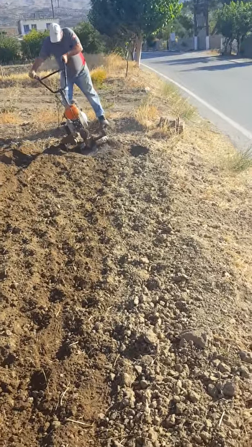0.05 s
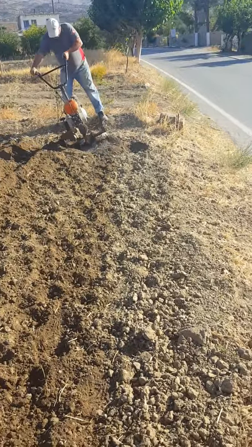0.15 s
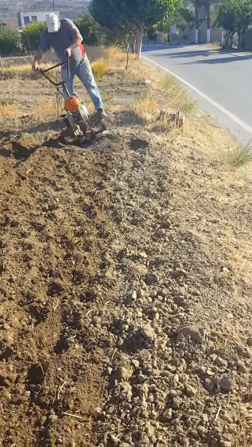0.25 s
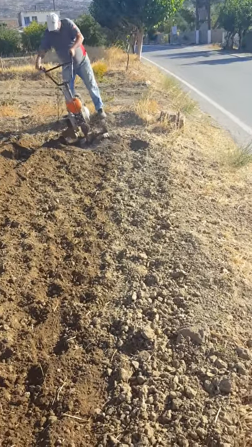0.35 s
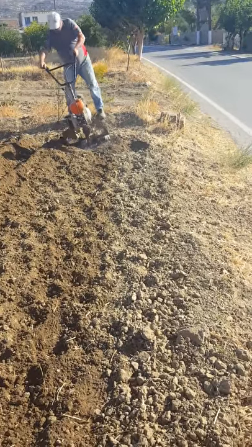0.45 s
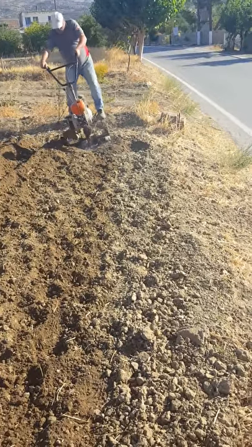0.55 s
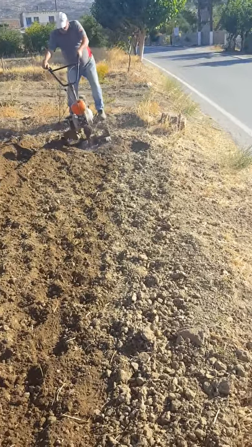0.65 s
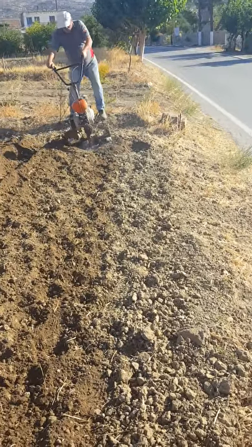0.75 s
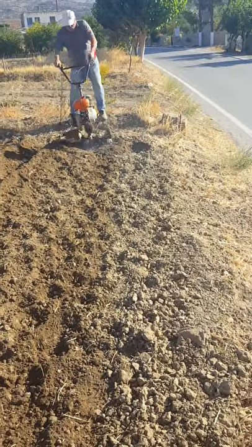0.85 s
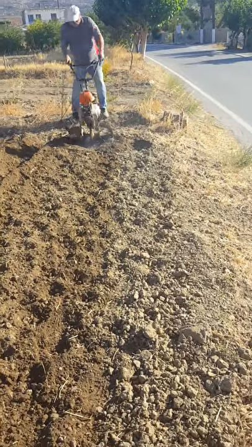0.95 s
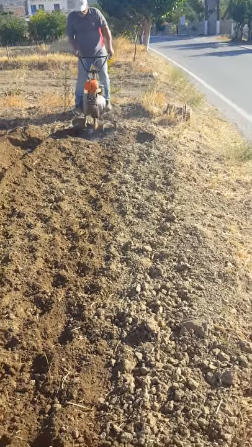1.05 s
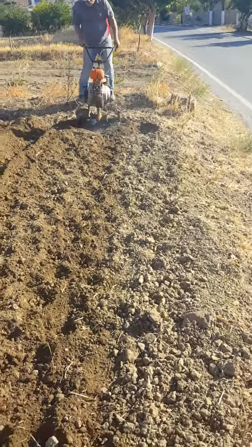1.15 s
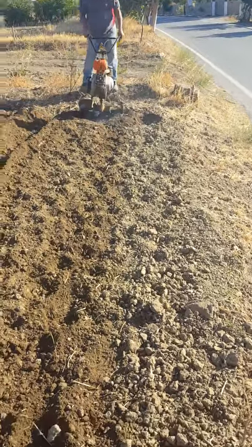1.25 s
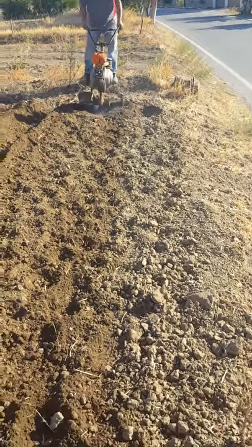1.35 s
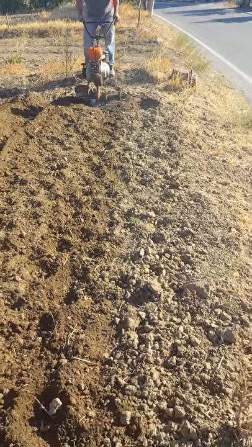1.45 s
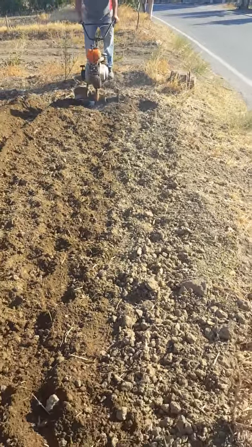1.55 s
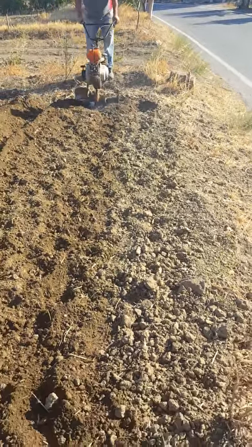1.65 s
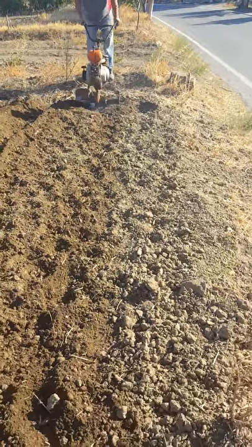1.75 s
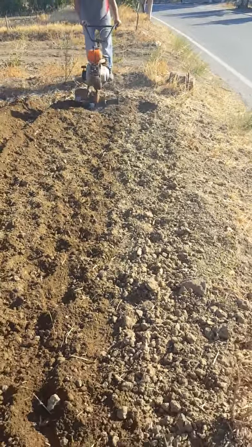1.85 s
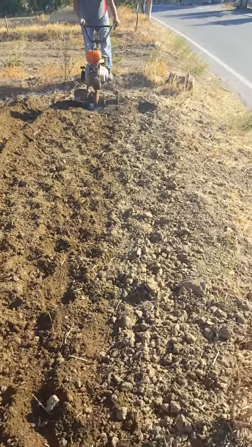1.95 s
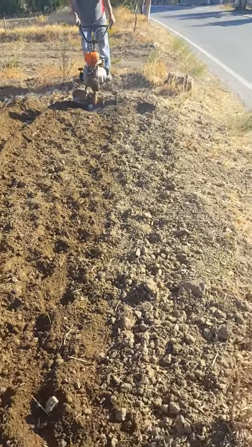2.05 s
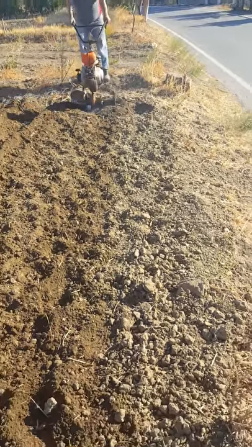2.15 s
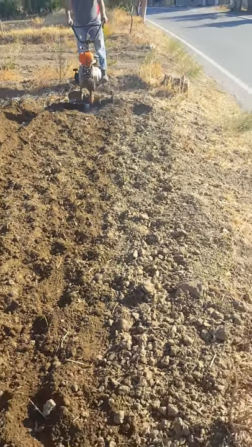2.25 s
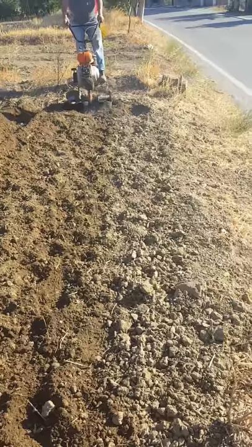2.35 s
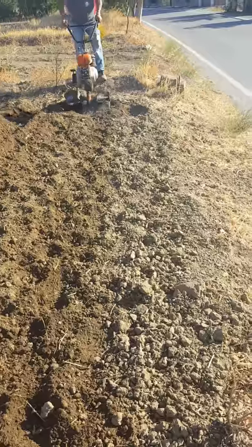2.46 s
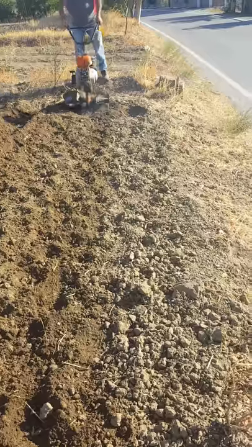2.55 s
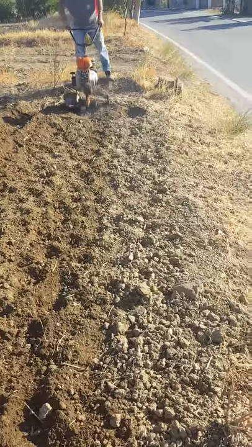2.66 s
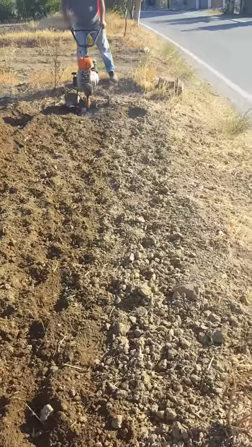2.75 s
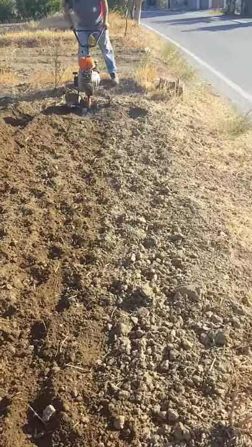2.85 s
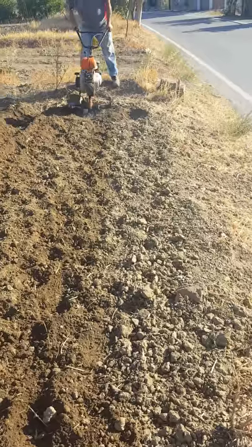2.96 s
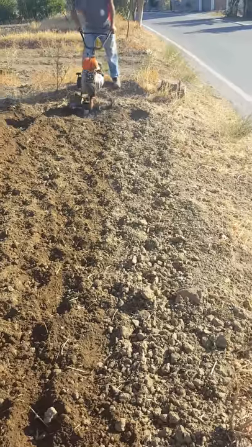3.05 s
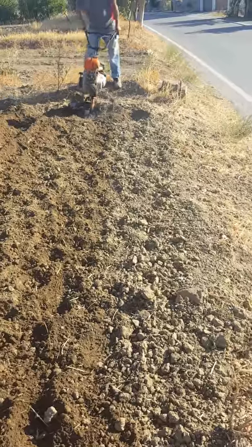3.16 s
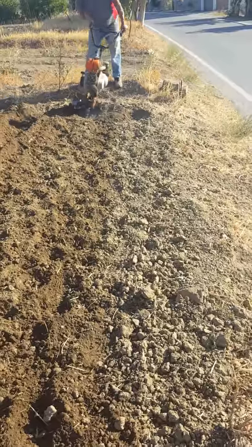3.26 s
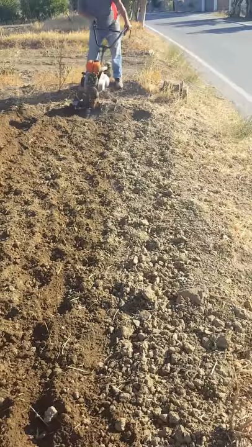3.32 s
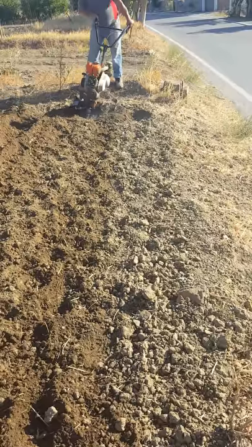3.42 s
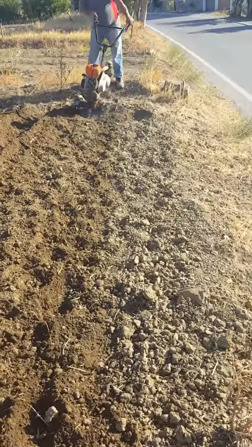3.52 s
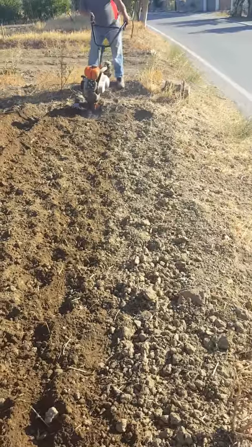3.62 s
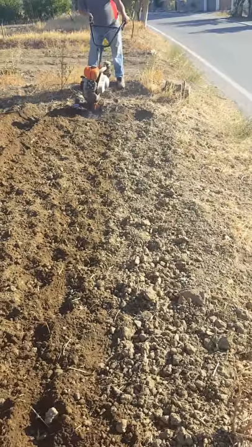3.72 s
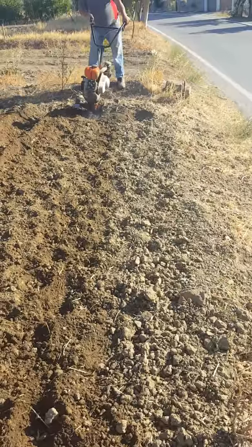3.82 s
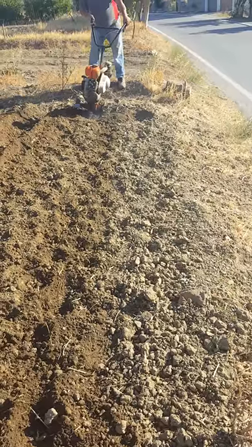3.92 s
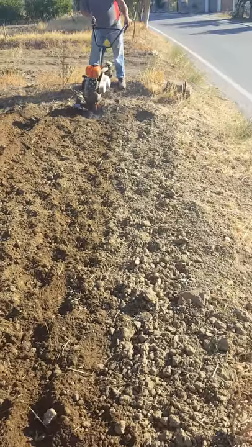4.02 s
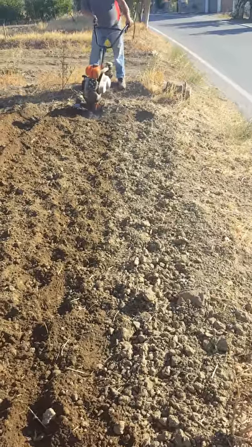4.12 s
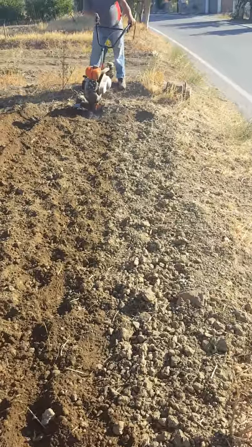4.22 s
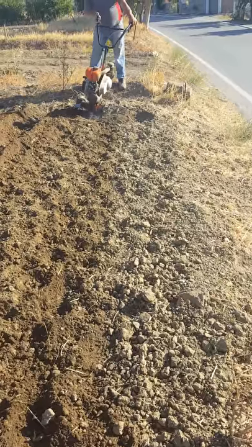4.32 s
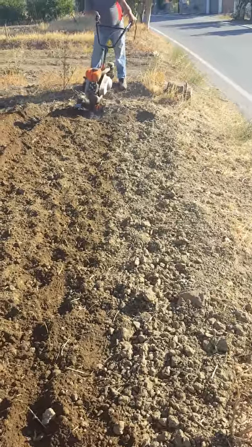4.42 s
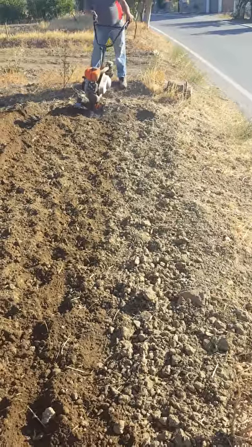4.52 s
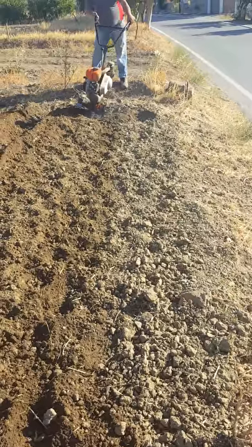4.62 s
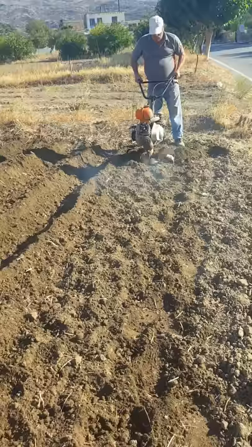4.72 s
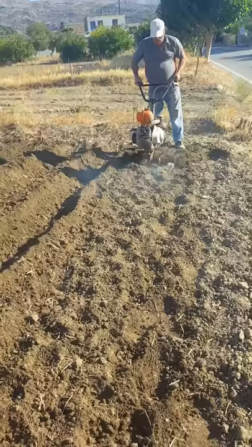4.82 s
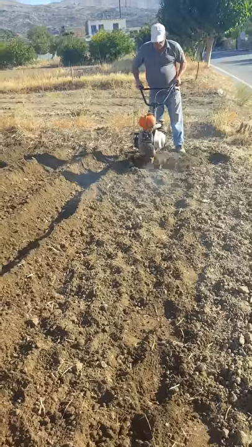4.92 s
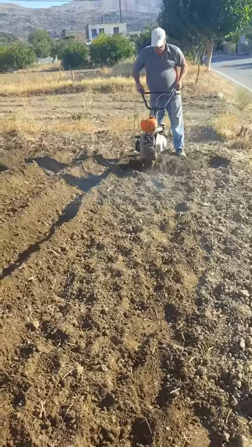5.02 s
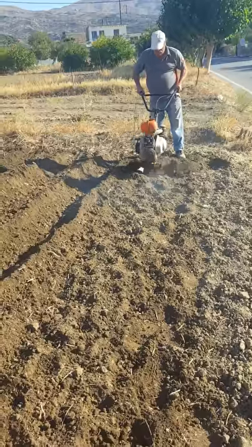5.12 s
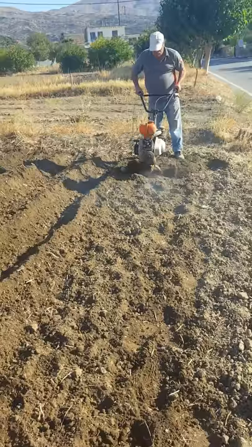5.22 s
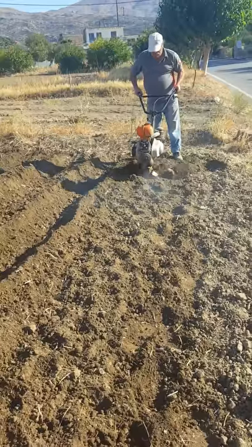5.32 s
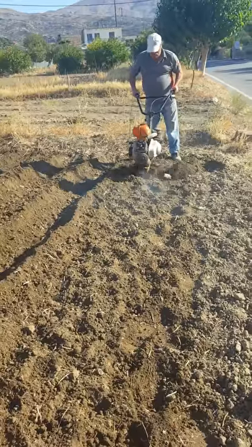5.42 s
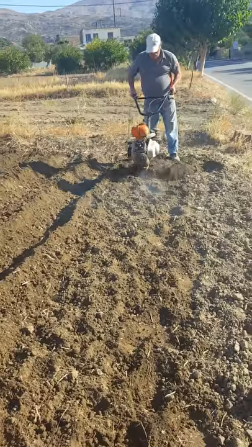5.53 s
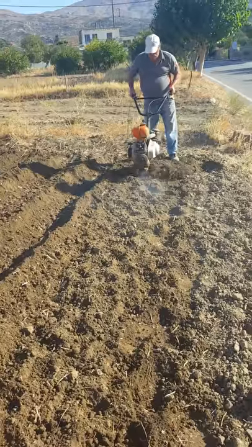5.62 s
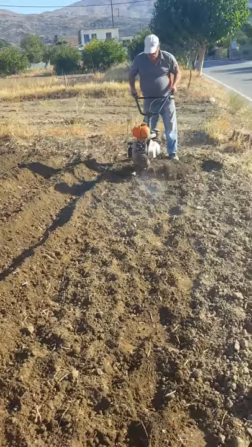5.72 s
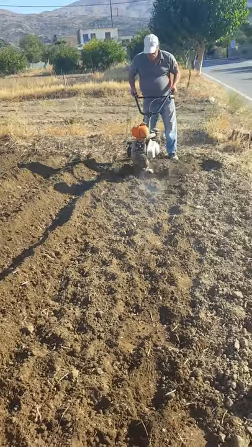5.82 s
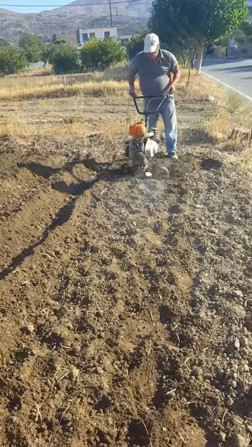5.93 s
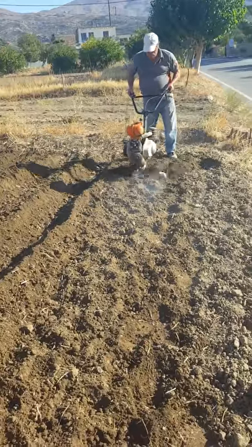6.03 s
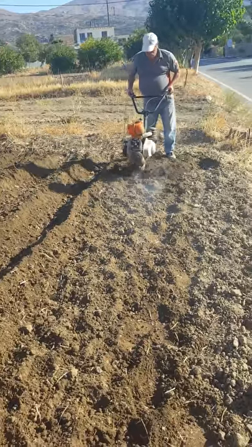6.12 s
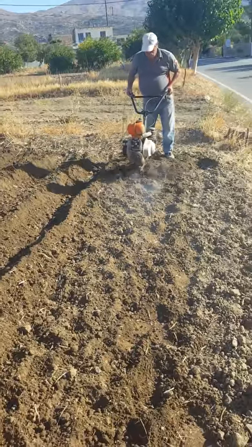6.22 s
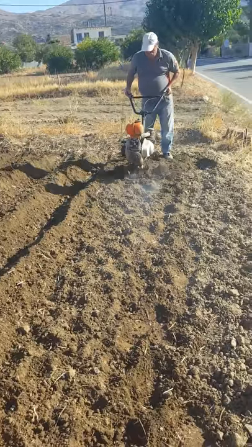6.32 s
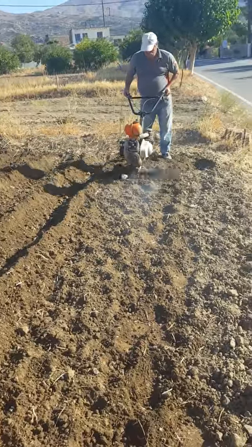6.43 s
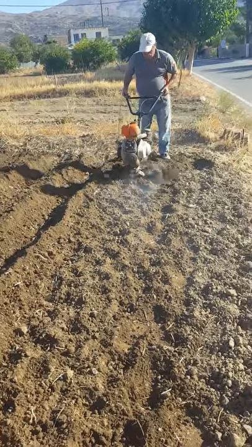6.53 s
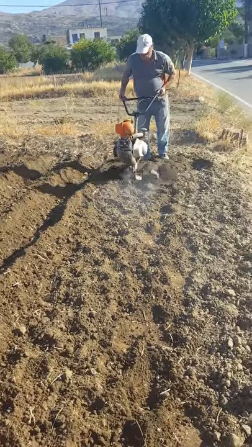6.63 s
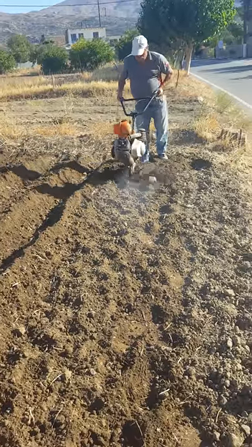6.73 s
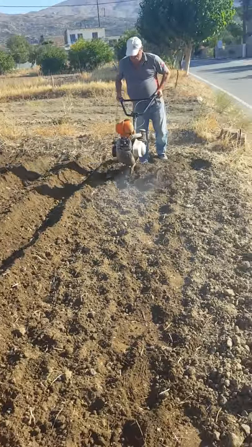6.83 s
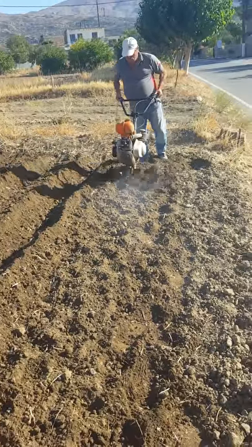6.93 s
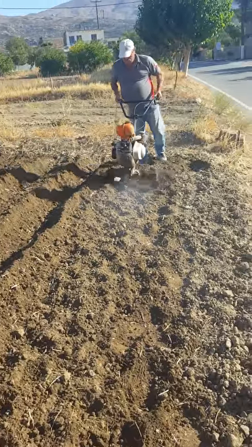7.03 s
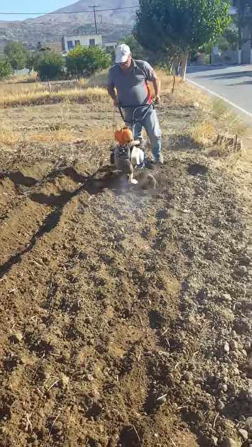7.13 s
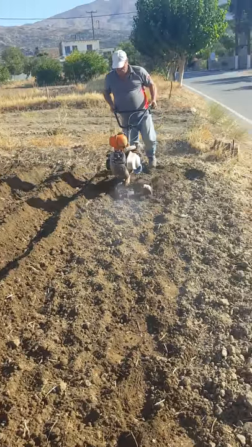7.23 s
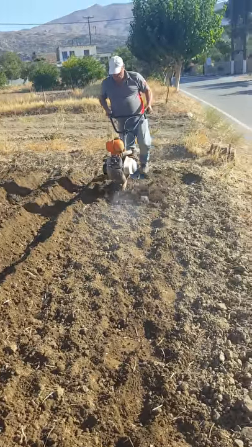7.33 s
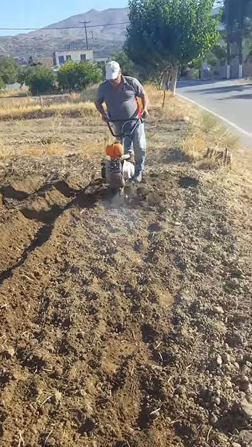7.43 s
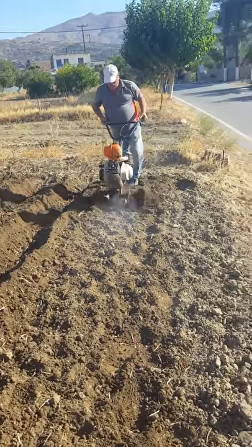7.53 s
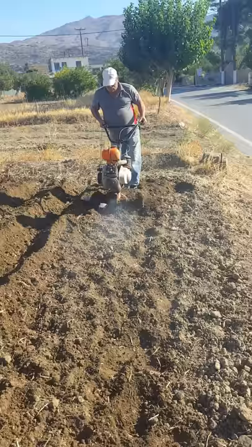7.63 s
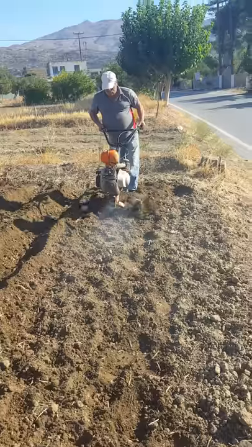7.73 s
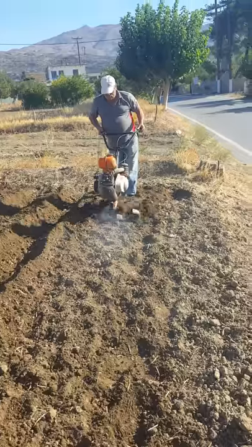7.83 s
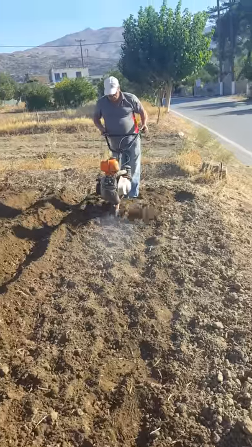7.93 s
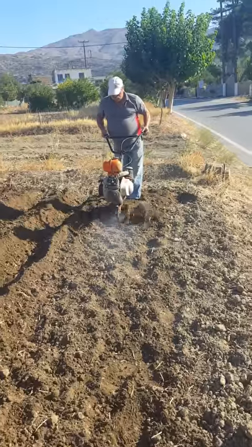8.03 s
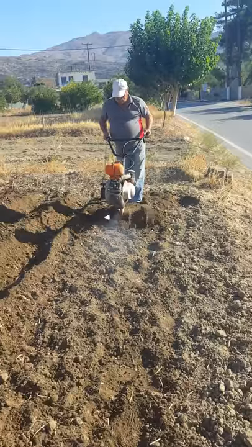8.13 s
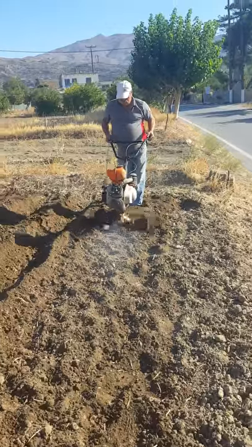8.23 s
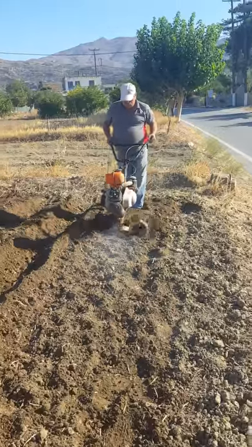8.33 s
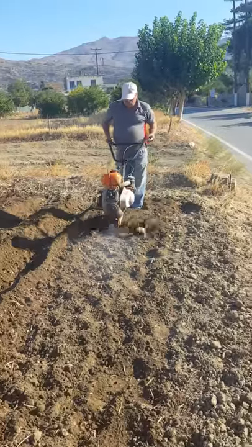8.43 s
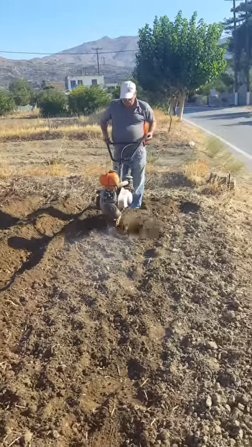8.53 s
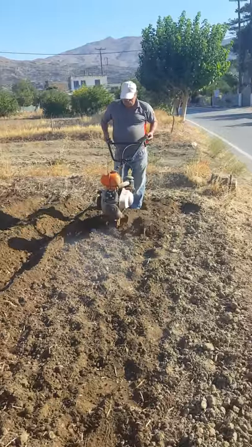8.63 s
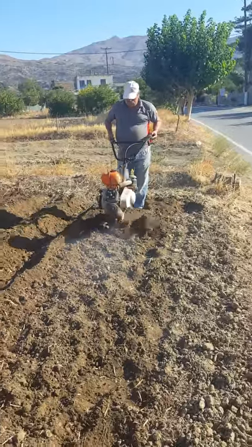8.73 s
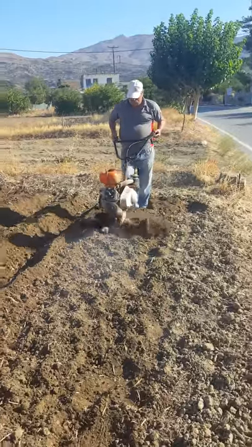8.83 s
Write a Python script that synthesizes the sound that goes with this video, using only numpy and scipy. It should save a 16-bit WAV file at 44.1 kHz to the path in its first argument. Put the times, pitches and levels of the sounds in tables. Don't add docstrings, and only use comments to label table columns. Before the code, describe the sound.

A little petrol engine splutters unevenly, metallic pops skipping over a low flutter and clattering panels, some pops weaker. A few stones tick against the guard. Then the load comes on and the pops merge into a continuous rough drone around thirty beats a second, brighter in rattle and rushing gas, with earth churning below. Close phone recording in open air, dry, with soft gusts.

```python
import sys
import numpy as np
from scipy import signal
from scipy.fft import rfft, irfft
from scipy.io import wavfile
from scipy.ndimage import uniform_filter1d

SR = 44100
rng = np.random.default_rng(int(sys.argv[2]) if len(sys.argv) > 2 else 0)


def store_pcm(level_fs):
    pcm = np.round(np.clip(level_fs, -1, 1) * 32767).astype(np.int16)
    wavfile.write(sys.argv[1], SR, np.atleast_2d(pcm).T)


def linear_from_db(decibels):
    return 10 ** (np.asarray(decibels, float) / 20)


N = 391166

FREE_CYCLE_S, BITE_S = .0267, 5.245
TROUGH_S = .005
TURN_S = 0.22

# (t/s, heat/dB)
FIRINGS_SWUNG = [(.0755, -17.5), (.2117, -18), (.3467, -17.5), (.4797, -17.5), (.5898, -18), (.6994, -17),
                 (.8129, -25.5), (.948, -26), (1.0882, -18), (1.198, -17), (1.3098, -18.5), (1.4492, -19)]
FIRINGS_FACING = [(1.5898, -27), (1.7276, -27), (1.8641, -21), (1.9985, -26.5), (2.107, -22.5),
                  (2.215, -20.5), (2.325, -20.5), (2.438, -32), (2.5697, -20), (2.7028, -22.5),
                  (2.832, -22), (2.9597, -21), (3.0895, -19), (3.2196, -17.5), (3.3505, -29), (3.4288, -25),
                  (3.5347, -23.5), (3.6662, -23), (3.795, -17), (3.925, -21.5), (4.0512, -17.5),
                  (4.1812, -18), (4.3116, -18), (4.4409, -18.5), (4.572, -18), (4.7037, -17),
                  (4.837, -18.5), (4.9697, -18), (5.1011, -18.5), (5.2088, -17.5)]
FIRINGS = FIRINGS_SWUNG + FIRINGS_FACING
# (t/s, cycle rate/Hz)
LOADED_SPEED = [(5.25, 27.87), (5.71, 30.134), (6.06, 28.589), (6.11, 29.696), (6.16, 28.42),
                (6.62, 29.256), (6.68, 27.453), (6.96, 31.766), (7.3, 32.033), (7.63, 30.688),
                (7.72, 32.55), (7.79, 29.652), (7.94, 33.226), (8.12, 31.851), (8.19, 32.737),
                (8.47, 29.942), (8.58, 30.564), (8.82, 26.078)]
# (t/s, exhaust level/dB)
EXHAUST_LEVEL = [(0, -16.5), (.9, -17), (1.1, -17), (1.5, -17), (1.68, -20.5), (1.8, -18), (1.98, -23.5),
                 (2.7, -23.5), (3.15, -18.5), (3.33, -15.5), (3.66, -17.5), (3.8, -15.5), (4.3, -15),
                 (5.18, -16), (5.32, -18), (6.6, -18), (6.9, -17.5), (8.87, -18.5)]
# (delay/s, f/Hz, t60/s, signed size, rise/s)
COLD_GAS = [(.0028, 180.1, 0.05, 1, 0.0022), (.0094, 135.6, 0.11, -0.35, 0.0077)]
FIRED_GAS = [(0.00396, 294.4, 0.02, 1.17, 0.0031), (0.0019, 170.6, 0.068, 0.77, 0.0041),
             (0.01066, 177.4, 0.072, 0.52, 0.0012)]
LOADED_GAS = [(0.003836, 256, 0.04, 0.88, 0.00099), (0.0036, 118.2, 0.074, -0.46, 0.0013),
              (0.01174, 151, 0.041, 1.69, 0.006), (0.00499, 443, 0.015, 0.096, 0.0011),
              (0.00494, 562, 0.019, 0.06, 0.00077)]
# (delay/s, f/Hz, t60/s, signed size, rise/s)
BOX_RING = [(.0045, 790, 0.034, .035, 0.00086)]

# (f/Hz, level/dB)
RATTLE_FREE = [(350, -29), (600, -21.5), (1000, 0.5), (1400, 4.5), (2500, 1), (5000, -11.5), (7000, -25),
               (14000, -30.5)]
RATTLE_LOADED = [(350, -16), (550, -8), (1000, 11), (2500, 7.5), (5000, -8.5), (7000, -26), (12000, -18)]
# (f/Hz, width/Hz, level/dB)
PANELS_FREE = [(865, 273, 3), (1623, 37, -0.5), (2091, 17.6, 5), (3055, 38, -4), (3760, 140, -7),
               (4940, 470, -17.5), (6490, 103, -12), (8700, 240, -51), (10600, 460, -26)]
PANELS_LOADED = [(836, 300, 2.5), (1255.6, 78, 2.5), (1702, 370, 1), (2072, 107, 9), (2306, 110, 9.5),
                 (3720, 1000, -9.5), (4356, 50, -34.5), (5230, 40, -55), (5463, 33.3, -32),
                 (6510, 400, -12)]
# (from/s, to/s, low f/Hz, high f/Hz, level/dB)
SWINGS = [
    (7.86, 8.2, 2450, 3100, 0),
    (8.168, 8.95, 2000, 2610, -4.5),
]
# (f/Hz, level/dB)
SOIL = [(70, -40), (120, -20), (170, -4), (300, 0), (480, -8), (750, -35), (1500, -80)]
# (f/Hz, level/dB)
WIND = [(12, -11), (25, -1), (50, 7.5), (100, 15.5), (150, -2), (250, -58.5), (600, -100)]
# (peak t/s, level/dB)
GUSTS = [(.3, -31), (.66, -30), (1.3, -33), (2.05, -40), (2.55, -45), (3.0, -46), (4.05, -29.5),
         (4.35, -30.5), (4.85, -33), (5.11, -29), (5.9, -33), (6.42, -30), (6.9, -31), (7.4, -37),
         (7.75, -33), (8.4, -23), (8.75, -29)]
# (f/Hz, level/dB)
FIRING_HISS = [(500, -40), (1500, 1.5), (4000, 9.5), (6000, 3.5), (9000, 4.5), (12000, 6), (15000, -3),
               (17000, -4)]
JET_HISS = [(800, -30), (2500, 6.5), (4000, 1), (6500, -4), (9000, 1.5), (12000, -0.5), (15000, -7),
            (17000, -25.5)]
# (f/Hz, width/Hz, level/dB)
JET_RINGS = [(3830, 230, 10.5), (4480, 130, 7), (5360, 45, 5), (5750, 110, 5.5), (8700, 400, -3.5),
             (11900, 400, -12)]
# (t/s, level/dB)
STONES = [
    (1.9544, -22),
    (2.3714, -17),
    (3.7014, -12),
    (6.767, -9),
]
# (multiple of the cycle rate, level/dB)
GEAR_ORDERS = [(26, -39), (39, -45), (65, -41.5)]

TURNS_S = [
    1.55,
    3.1,
    5.245,
    7.88,
]
# (casing level/dB, casing 1.6-2.8 kHz lift/dB, soil level/dB)
FACING = [(-37.5, 3, -38), (-34.5, 3, -30.5), (-35, 2.5, -33.5), (-34.5, -0.3, -35.5), (-33, -1.3, -35)]
# (outlet plate level/dB, neck thump level/dB)
OUTLET = [(3.5, 1.5), (6, 7), (5, 5)]
PORT_PAIR = [(10, 1), (11, 0), (11, .5), (8.5, 1), (7, .9)]
# (f/Hz, phase/rad)
BENT = [(0, 0), (400, -.4), (1100, .35), (2600, -.88), (3400, -.1), (5800, .5), (6400, -2.8), (8000, -.1)]
BENT_SHADOW = [(0, 0), (1100, -0.033), (1500, -2.1), (2600, 0.85), (4000, 0.032)]
# (f/Hz, level/dB)
OPEN_SIDE = [(0, 0.5), (3500, -0.5), (4500, -8), (5500, 5), (7000, -9), (8300, -8), (9800, 14), (11000, -1)]
SHADOW_SIDE = [(0, 0.1), (450, -6), (1150, 3.5), (1750, -8), (2300, -9), (3500, -3), (5500, 0.5),
               (12000, 2.5)]
# (f/Hz, share 0-1)
SAME = [(700, .92), (1500, .86), (2400, .99), (2800, .98), (3400, .88), (5000, .75), (9000, .72),
        (13000, .62)]
# (f/Hz, width/Hz, level/dB)
SOIL_DIP = [(1430, 350, -9), (1630, 50, -15), (1610, 350, -9.5), (1077, 110, -5.5), (1620, 450, -4)]
# (f/Hz, width/Hz, level/dB)
FRAME_DIPS = [(642, 81, -4), (1970, 94, -5), (2907, 220, -1), (1280, 45, -7)]


def evened(x):
    return x / np.sqrt(np.mean(x ** 2) + 1e-20)


def read(points, hz):
    f, value = np.transpose(points)
    return np.interp(np.log(hz + 1), np.log(f + 1), value)


def add(mix, s, sound):
    at = round(s * SR)
    part = mix[max(at, 0):max(at + len(sound), 0)]
    part += sound[max(-at, 0):][:len(part)]


def highpassed(x, hz):
    return signal.sosfiltfilt(signal.butter(2, hz / (SR / 2), "high", output="sos"), x)


def band(x, low_hz, high_hz):
    return signal.lfilter(*signal.butter(2, [low_hz / (SR / 2), high_hz / (SR / 2)], "band"), x)


def noise(points, rings=(), rings_db=0):
    hz = np.fft.rfftfreq(N, 1 / SR)
    power = linear_from_db(read(points, hz)) ** 2
    for f, width, db in rings:
        power = power + linear_from_db(db + rings_db) ** 2 / (1 + (2 * (hz - f) / width) ** 2) ** 2
    return evened(irfft(rfft(rng.standard_normal(N)) * np.sqrt(power), N))


def drift(per_s):
    steps = rng.standard_normal(int(N / SR * 400) + 2)
    smooth = signal.lfilter(*signal.butter(2, per_s / 200), steps)
    return np.interp(np.arange(N) / SR * 400, np.arange(len(steps)), evened(smooth))


def facing(column):
    db = np.array(FACING)[np.searchsorted(TURNS_S, np.arange(N) / SR), column]
    return linear_from_db(uniform_filter1d(db, int(TURN_S * SR)))


def outlet(s):
    return OUTLET[np.searchsorted(TURNS_S, s)]


def exhaust_gain():
    return linear_from_db(17.5 + np.interp(np.arange(N) / SR, *np.transpose(EXHAUST_LEVEL)))


def gas_pulse(columns, luck, rough, warmth=1):
    t, out = np.arange(2600) / SR, 0
    for (delay, hz, t60, size, rise), (a, b, c) in zip(columns, luck.reshape(-1, 3)):
        u = np.maximum(t - delay - 0.0014 * rough * c, 0)
        shape = linear_from_db(1.2 * rough * a - 60 * u / t60) * (1 - np.exp(-u / rise))
        out = out + size * shape * np.sin(2 * np.pi * hz * warmth * (1 + 0.24 * rough * b) * u)
    return out


def puff(rise, t60):
    t = np.arange(3000) / SR
    return (1 - np.exp(-t / rise)) ** 2 * linear_from_db(-60 * t / t60)


def cold_cycles():
    before = FIRINGS[0][0] - 5 * FREE_CYCLE_S
    fired = np.array([before] + [row[0] for row in FIRINGS] + [BITE_S + .02])
    counts = np.round(np.diff(fired) / FREE_CYCLE_S).astype(int)
    times = []
    for a, b, k in zip(fired, fired[1:], counts):
        u = np.arange(1, k) / k
        times.append(a + (b - a) * (u - .05 * u * (1 - u)))
    return np.concatenate(times)


def loaded_cycles():
    t = np.arange(LOADED_SPEED[0][0], N / SR + .05, 1 / SR)
    turns = np.cumsum(np.interp(t, *np.transpose(LOADED_SPEED))) / SR
    return np.interp(np.arange(int(turns[-1])) + .04, turns, t) - .002


def free_exhaust():
    pumping, bangs = np.zeros((2, N))
    cold = cold_cycles()
    fired = np.array([-.06] + [row[0] for row in FIRINGS])
    since = cold - fired[np.searchsorted(fired, cold) - 1]
    warmth = 0.965 + 0.067 * np.exp(-since / 0.074)
    for s, warm, luck in zip(cold, warmth, rng.standard_normal((len(cold), 6))):
        add(pumping, s - TROUGH_S + .0028, gas_pulse(COLD_GAS, luck, .16, warm))
    for (s, heat_db), luck in zip(FIRINGS, rng.standard_normal((len(FIRINGS), 12))):
        heat = linear_from_db(heat_db + outlet(s)[1] + 17)
        at = s - TROUGH_S
        add(bangs, at, heat * gas_pulse(FIRED_GAS[:1], luck[:3], rough=0.13))
        add(pumping, at, min(heat, 1) * gas_pulse(FIRED_GAS[1:], luck[:6], rough=0.19))
        add(pumping, at, max(1 - heat, 0) * gas_pulse(COLD_GAS, luck[6:], rough=0.5))
    return highpassed(exhaust_gain() * pumping + bangs, 99.0)


def swung(rattle):
    t, out = np.arange(N) / SR, 0
    for a, b, low_hz, high_hz, db in SWINGS:
        shown = np.clip(np.minimum(t - a, b - t) / TURN_S + .5, 0, 1)
        out = out + linear_from_db(db) * shown * band(rattle, low_hz, high_hz)
    return out


def casing():
    knocks = np.zeros(N)
    for s in np.concatenate([cold_cycles(), [row[0] for row in FIRINGS], loaded_cycles()]):
        add(knocks, s - .002, puff(0.00079, 0.7))
        add(knocks, s + 0.012, puff(0.0032, 0.17))
    throb = evened(0.57 + knocks) * linear_from_db(1.7 * drift(30) + 0.24 * drift(37.0))
    loaded = np.clip((np.arange(N) / SR - BITE_S) / 0.071, 0, 1)
    rattle = (1 - loaded) * noise(RATTLE_FREE, PANELS_FREE, 7.25)
    rattle = rattle + loaded * noise(RATTLE_LOADED, PANELS_LOADED, 9.5)
    rattle = signal.lfilter(*signal.butter(3, 15500 / (SR / 2)), rattle)
    bright = (facing(column=1) - 1) * band(rattle, 1600, 2800)
    return linear_from_db(6.5) * facing(column=0) * throb * (rattle + bright + swung(rattle))


def soil():
    return facing(column=2) * noise(SOIL) * linear_from_db(2.7 * drift(26))


def gusts():
    t = np.arange(N) / SR
    return linear_from_db(-45) + sum(linear_from_db(db) * np.exp(-((t - s) / 0.18) ** 2) for s, db in GUSTS)


def wind():
    gust = gusts() * linear_from_db(2.2 * drift(5.9))
    left, right, both = (noise(WIND) for _ in range(3))
    return gust * (.7 * both + .7 * np.array([left, right]))


def spits():
    hiss = np.zeros(N)
    for s, heat_db in FIRINGS:
        spit = puff(0.0012, 0.013) + linear_from_db(-21) * puff(0.0025, 0.079)
        add(hiss, s - .0006, linear_from_db(heat_db + 7.5) * spit)
    for s, db in STONES:
        add(hiss, s, linear_from_db(db - 7.0) * puff(0.00031, 0.00343))
    return hiss * noise(FIRING_HISS) * linear_from_db(3.9 * drift(198))


def outlet_plate():
    ring, t = np.zeros(N), np.arange(3000) / SR
    plate_hz, bend_hz, bend_s = 2238, 217, 0.0036
    turns = plate_hz * t - bend_hz * bend_s * np.exp(-t / bend_s)
    plate = np.sin(2 * np.pi * turns) + linear_from_db(-13.5) * np.sin(2 * np.pi * 3780 * t)
    for s, heat_db in FIRINGS:
        add(ring, s - .0005, linear_from_db(heat_db + outlet(s)[0]) * puff(0.00031, 0.045) * plate)
    return ring * linear_from_db(3.2 * drift(63))


def loaded_exhaust():
    working, loaded = np.zeros(N), loaded_cycles()
    for s, luck in zip(loaded, rng.standard_normal((len(loaded), 15))):
        add(working, s - TROUGH_S, linear_from_db(1.5) * gas_pulse(LOADED_GAS, luck, rough=0.056))
        add(working, s - TROUGH_S, gas_pulse(BOX_RING, luck[:3], rough=.08))
    return highpassed(exhaust_gain() * working, 65.0)


def loaded_jet():
    jet, loaded = np.zeros(N), loaded_cycles()
    for s, luck in zip(loaded, rng.standard_normal(len(loaded))):
        rush = puff(0.0025, 0.033) + linear_from_db(-40) * puff(0.0018, 0.055)
        add(jet, s - .0025, linear_from_db(-21.5 + 1.1 * luck) * rush)
    return jet * noise(JET_HISS, JET_RINGS, 7.9) * linear_from_db(3.9 * drift(198))


def gears():
    t = np.arange(N) / SR
    turn = 2 * np.pi * np.cumsum(np.interp(t, *np.transpose(LOADED_SPEED))) / SR
    whine = 0
    for order, db in GEAR_ORDERS:
        whine = whine + linear_from_db(db + 1.6 * drift(8)) * np.cos(order * turn + .6 * drift(10))
    return (t > BITE_S) * whine


def dip(hz, at_hz, width, db):
    return db * np.exp(-(2 * (hz - at_hz) / width) ** 2)


def turned(rows, t):
    frames = max(int(0.21 / (t[1] - t[0])), 1)
    return uniform_filter1d(np.array(rows)[np.searchsorted(TURNS_S, t)], frames, axis=0).T


def ports(x, other):
    hz, t, (z, z_other) = signal.stft([x, other], SR, nperseg=1024, noverlap=768)
    curves = (BENT, BENT_SHADOW, OPEN_SIDE, SHADOW_SIDE)
    bent, bent_shadow, open_db, shadow_db = (np.interp(hz, *np.transpose(p)) for p in curves)
    side_db = turned([open_db + shade * (shadow_db - open_db) for _, shade in PORT_PAIR], t)
    phases = [2 * np.pi * hz * lead / SR + bent + shade * bent_shadow for lead, shade in PORT_PAIR]
    half = linear_from_db(side_db / 2) * np.exp(.5j * turned(phases, t))
    patches = uniform_filter1d(rng.standard_normal(z.shape[::-1]), 16, 0)
    patches = evened(uniform_filter1d(patches, 12, 1)).T
    tint = linear_from_db(1.4 * patches * np.clip(hz / 3000 - .2, 0, 1)[:, None])
    frame_db = sum(dip(hz, *row) for row in FRAME_DIPS)
    tint = tint * linear_from_db(turned([dip(hz, *row) + frame_db for row in SOIL_DIP], t))
    same = read(SAME, hz)[:, None]
    right = same * z + np.sqrt(1 - same ** 2) * z_other
    pair = [z * half * tint, right / half * tint]
    return signal.istft(pair, SR, nperseg=1024, noverlap=768)[1][:, :N]


def noisy_parts():
    return casing() + spits() + outlet_plate() + loaded_jet()


def scene():
    direct = free_exhaust() + loaded_exhaust() + gears() + soil() + noisy_parts()
    tiller = ports(direct, linear_from_db(5.5) * soil() + noisy_parts())
    return tiller + wind()


def low_pass(x):
    return signal.sosfilt(signal.butter(12, 16500, fs=SR, output="sos"), x)


def record(dry):
    limited = np.tanh(dry / 2.117) * 1.747
    edge = signal.firwin(95, 15850, fs=SR)
    return low_pass(signal.oaconvolve(limited, edge[None], "same"))


dry = scene()
out = record(dry)
store_pcm(out)
```